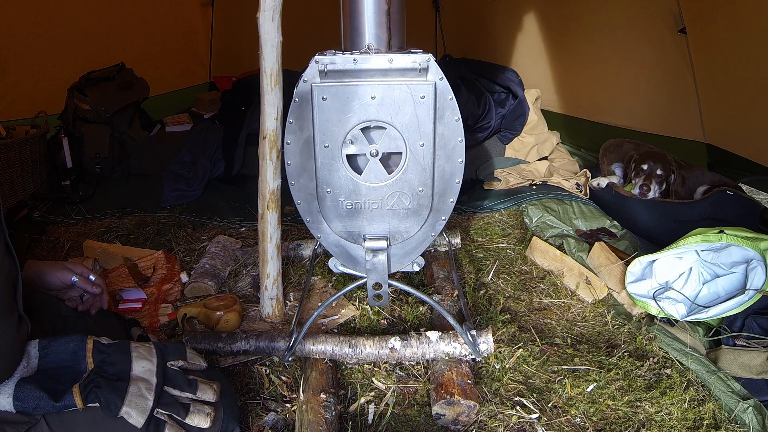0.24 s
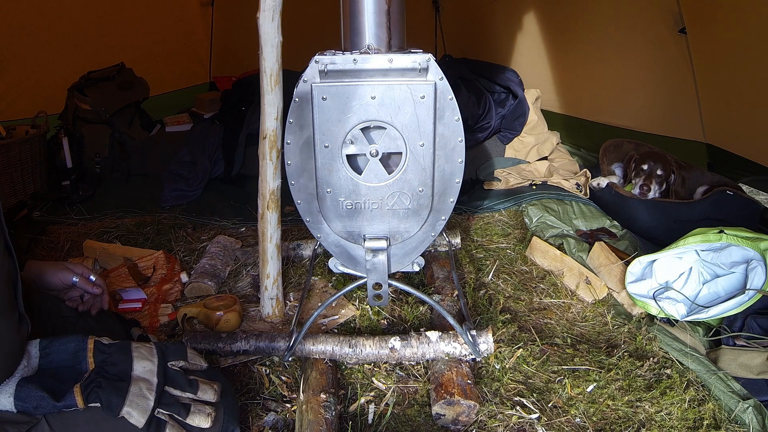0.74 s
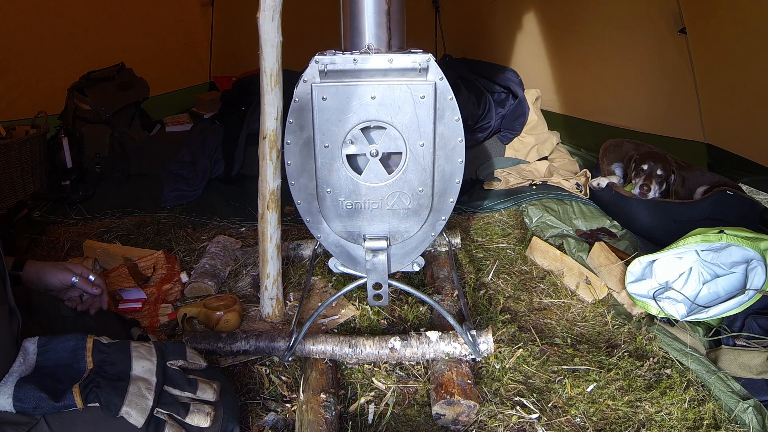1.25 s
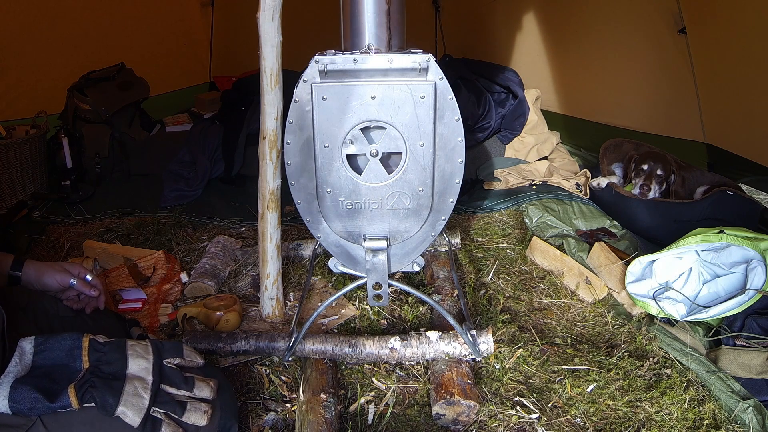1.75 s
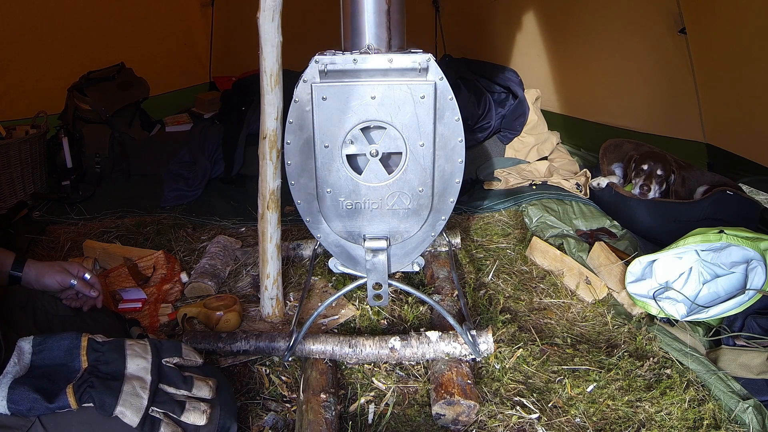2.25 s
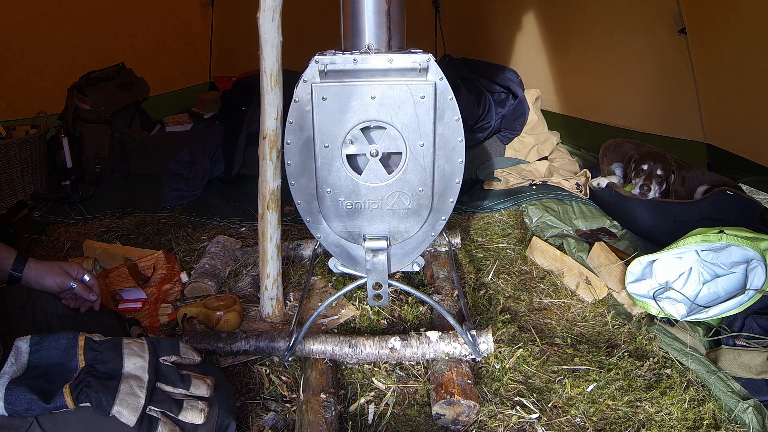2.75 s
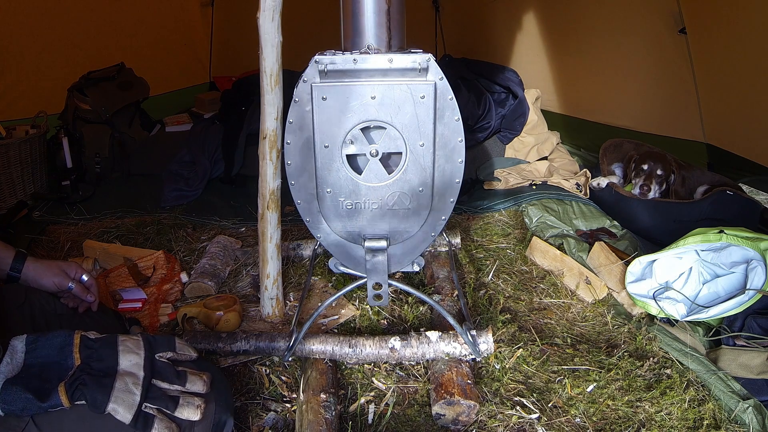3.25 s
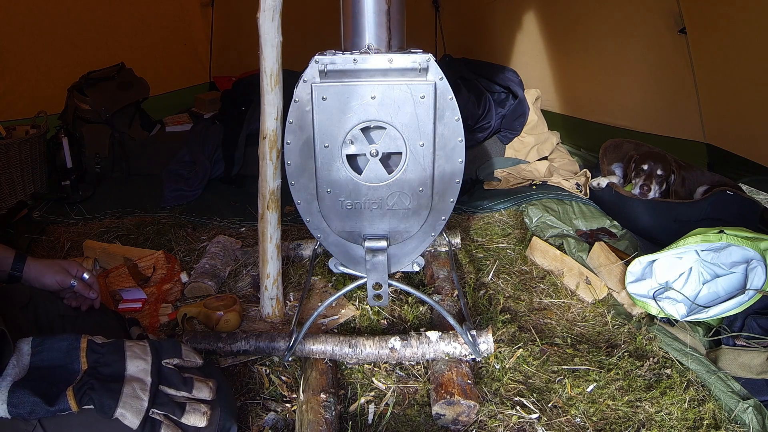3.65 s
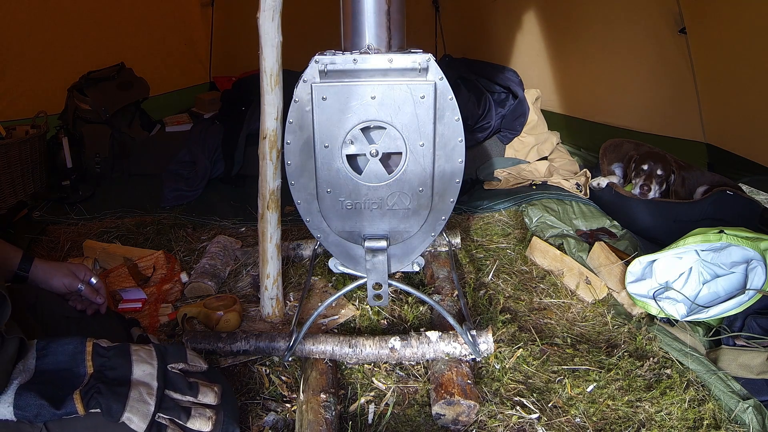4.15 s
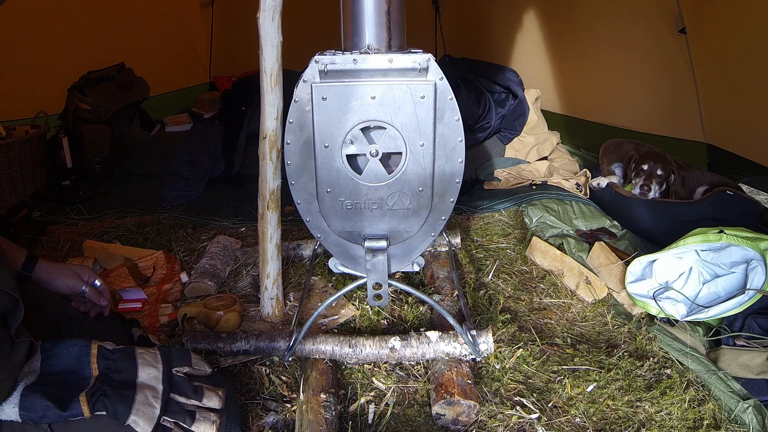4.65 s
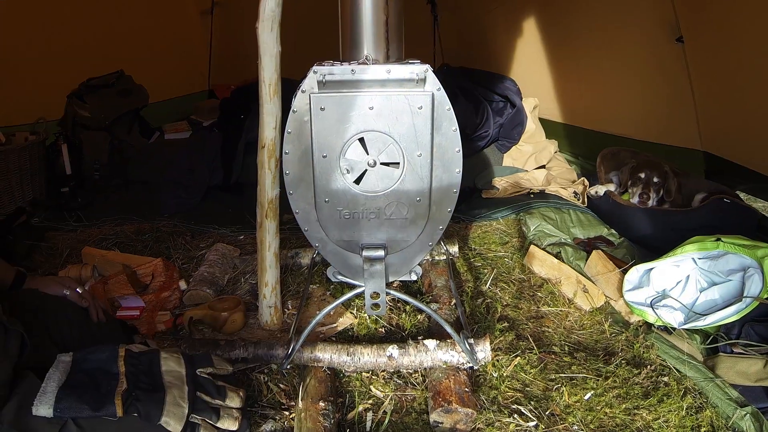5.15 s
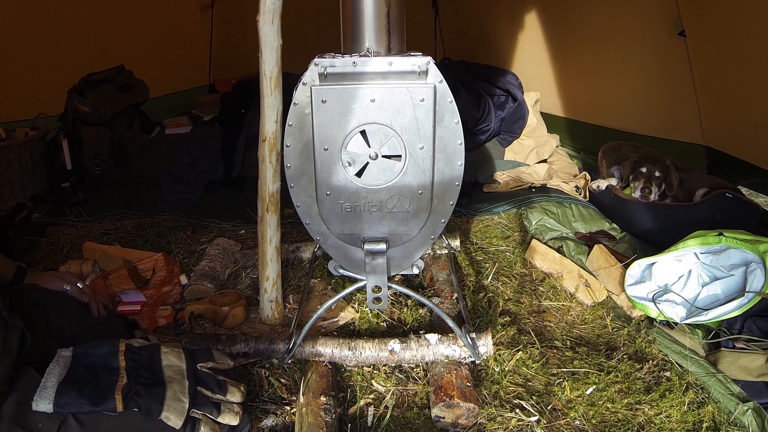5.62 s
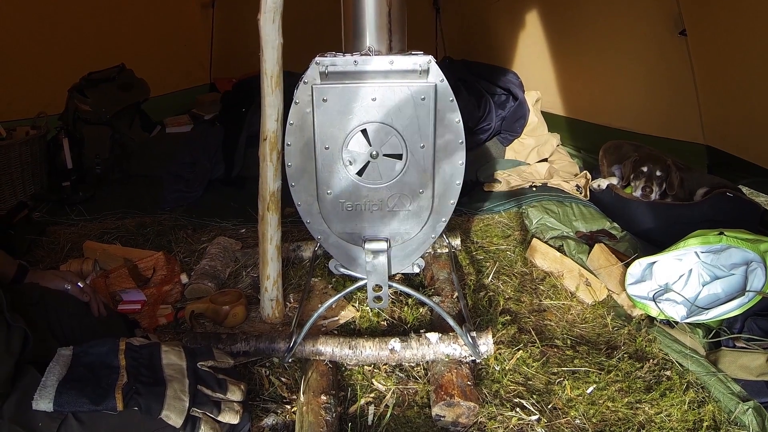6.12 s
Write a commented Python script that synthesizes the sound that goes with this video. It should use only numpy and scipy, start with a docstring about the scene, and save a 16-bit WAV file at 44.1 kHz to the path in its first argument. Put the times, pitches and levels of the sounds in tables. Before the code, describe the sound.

Burning logs snap irregularly inside a thin metal firebox. Bright noisy bursts have short metallic ringing tails, over continuous soft hiss and low fluttering flames. Loud cracks cluster early with low thumps, thin out, return as a fierce trio midway, then give way to small crackles. After a tiny silence, duller little pops lead to one loud crack with a faint pipe ring. Close, dry, centred pickup with automatic level pumping.

```python
"""Log fire in a closed stove

Wood burns in a sheet-steel stove inside a tent. Sap pockets pop as noise bursts and set damped firebox modes ringing;
a log thumps, a spark strikes the flue pipe and embers spit over filtered-noise flames, draught and hiss.
One microphone feeds both channels, each with its own standing offset and a faint noise of opposite sign.
The level drops around loud pops, climbs back slowly, and the sound cuts out once for a moment."""
import sys
import numpy as np
from scipy import signal
from scipy.fft import rfft, irfft, next_fast_len
from scipy.io import wavfile
from scipy.ndimage import uniform_filter1d, map_coordinates

SR = 44100
rng = np.random.default_rng(int(sys.argv[2]) if len(sys.argv) > 2 else 0)


def file_out(sig):
    """Save sig as 16-bit WAV at sys.argv[1]."""
    # one column per channel
    cols = np.atleast_2d(sig).T
    # limit, then scale
    lim = np.clip(cols, -1, 1)
    pcm = np.round(lim * 32767).astype(np.int16)
    wavfile.write(sys.argv[1], SR, pcm)


N = 281355

# All source levels precede the moving gain of record(); pop() adds fixed trims to the pop columns.
# sap pockets that snap: start_s, treble_db, then relative to it upper_db, middle_db, knock_db, echo_db
SAP_POPS = [(0.1592, -27, -4, -7, -34, -7), (0.219, -25.5, -17, -19, -22, -14),
            (0.3496, -43, -13, -13, -15, -5), (0.3597, -39.5, -8, -12, -24, -1.5),
            (0.4141, -45, 0, -10, -13, -4), (0.4747, -33.5, -3, -10, -20, -9.5),
            (0.5492, -32.5, -3, -10, -17, -9), (0.6066, -40.5, -4, -23, -18, -9),
            (0.6515, -39.5, -1, -6, -28, 4.5), (0.663, -23, -6, -9.5, -25, -5),
            (0.7009, -25.5, -1.5, -3.5, -14.5, -11.5), (0.8536, -14, -3, -13.5, -24, -9),
            (0.9035, -3.5, -3, -13, -29, -12.5), (0.9743, -35, -4, -20, -8, -4),
            (1.0754, -2.5, -4.5, -11.5, -22.5, -11.5), (1.1384, -21, -8, -17, -22, -10),
            (1.1904, -24.5, 1, 1, 5, -8), (1.2984, 3, -0.5, -5, -16.5, -13), (1.3981, -37, -8, 0, -8, -16),
            (1.5416, -6, -5.5, -9, -22, -13.5), (1.6951, -48.5, 5, -4, -19, -0.5),
            (1.9087, -36, -6, -16, -13, -7), (1.9428, -30, -5, -9.5, -15, -8),
            (2.1993, -32.5, -6, -9.5, -14, -7), (2.233, -37, -7, -12, -4, -16),
            (2.2783, -33, -3, -13, -22, -8), (2.3258, -40.5, -3.5, -12.5, -11, -4),
            (2.435, -32.5, -8, -11, -27, -3.5), (2.6066, -43.5, -1, 1.5, 4, -4),
            (2.628, -30.5, -6, -9.5, -22, -8.5), (2.776, -38.5, -5, -5, -16, 0),
            (2.867, 5.5, -4.5, -9.5, -23.5, -13.5), (2.9988, 2.5, -9.5, -16, -31.5, -8.5),
            (3.132, 7, -5, -3, -17, -17), (3.3245, -28.5, -8, -16.5, -9, -2),
            (3.417, -42.5, -11, -12, -4.5, -2.5), (3.518, -26, -6, -12, -20, -4.5),
            (3.6088, -46.5, -3, -9, -12, -13), (3.6493, -26.5, -8.5, -11, -15, -12.5),
            (3.8722, -42, -3, -10, -11, -11), (4.0044, -42, -10, -15, -9, -5),
            (4.3284, -14.5, -11.5, -15.5, -25.5, -9.5), (4.4087, -28.5, 8.5, 0.5, -4.5, -12),
            (4.6824, -31.5, -8.5, -9, -11, -9.5), (4.7312, -43, -10, -2, -18, -14),
            (4.8573, -17.5, -14, -14.5, -31.5, -10.5), (5.3044, -57, -13, 8, -18, -9),
            (5.3158, -48.5, -20, -15, -20, -6), (5.3324, -39, -24.5, -25.5, -18, -20),
            (5.467, -30, -17, -15, -18.5, -13), (5.523, -21.5, -20, -13.5, -25, -12.5),
            (5.6671, -43.5, -13, -1, -18, -10), (5.6826, -20.5, -18.5, -11, -19, -10.5),
            (5.8832, 9, -12.5, -12, -23.5, -14.5), (6.1774, -45.5, -11, 1.5, -17.5, -7)]
# soft puffs of gas that swell instead: same columns
GAS_PUFFS = [(5.0152, -32, -19, -6, -28.5, 10), (6.0813, -39.5, -7, 1, -17, 2.4)]
POP_RISE_MS, PUFF_RISE_MS = 0.6, 11.4  # time constants of the onset
UNEVEN_DB = 2.5  # rms unevenness of a pop's spectrum
# spectrum of a pop heard through the steel: freq_hz, level_db
CRACK_SPECTRUM = [(300, -13), (1000, -17.5), (1900, -12.5), (2800, -7.5), (3900, -4), (6000, -1.5),
                  (7400, -3.5), (11000, 1), (15000, -4), (15700, -14.5), (17000, -25)]
# decay of the first burst: freq_hz, t60_s
BURST_DECAY = [(500, 0.018), (3000, 0.037), (10000, 0.04), (15000, 0.02)]
# decay of its echo in firebox and tent: freq_hz, t60_s
ECHO_DECAY = [(500, 0.22), (1500, 0.074), (3500, 0.17), (7000, 0.17), (15000, 0.13)]
# firebox knock modes: pitch_hz, level_db, t60_s
FIREBOX_MODES = [(718, -25.5, 0.92), (755, 8, 0.05), (1112, -18, 0.34), (1390, -6.5, 0.091),
                 (1528, -7, 0.073), (2056, -10.5, 0.14)]
# the largest firebox panel: pitch_hz, level_db, t60_s
PANEL_MODE = [(443, -1, 0.21)]
# crowded upper modes of the sheet: centre_hz, width_hz, level_db
SHEET_MODES = [(1480, 260, -3), (1976, 180, -3), (2310, 96, -1.5), (2440, 88, -0.5), (2740, 150, 0),
               (2990, 63, 3.5), (3076, 52, 0), (3260, 170, -7), (3360, 180, -9), (3690, 110, 1.5),
               (3940, 260, -5), (4380, 220, -4), (4910, 180, -7.5), (5910, 880, -7)]
# a log settles and thumps the stove floor: start_s, level_db, pitch_hz, t60_s
LOG_THUMPS = [(1.1925, -5, 66, .075), (1.1955, -10, 118, .06), (3.0, -9, 108, .06), (1.301, -20, 62, .1)]
# a spark strikes the flue pipe: start_s, level_db
PIPE_STRIKE = (5.885, -30)
# flue pipe modes: pitch_hz, level_db, t60_s
PIPE_MODES = [(832, 0, 0.82), (850, 1, 0.83), (1130, -9.5, .8)]
# flame rumble: freq_hz, level_db
RUMBLE_SPECTRUM = [(15, -1), (30, -4.5), (63, -2), (120, -9.5), (220, -17.5), (400, -19.5), (900, -47)]
# air in the flue: freq_hz, level_db
DRAUGHT_SPECTRUM = [(120, -28.5), (285, -7.5), (356, -10), (433, -0.5), (870, 1.5), (1300, -8),
                    (2250, -22.5), (4000, -42.5)]
# hiss: freq_hz, level_db
HISS_SPECTRUM = [(500, -9), (2250, 2), (4000, -1.5), (7000, -2.5), (10500, -1.5), (12500, -3.5),
                 (15000, -7.5), (15500, -22), (17000, -28)]
# level of the hiss: time_s, level_db
HISS_LEVEL = [(0, -46.5), (.8, -47), (1.6, -47), (2.4, -45), (3.2, -43.5), (3.8, -45.5), (4.4, -47),
              (4.93, -47), (5.0, -47.5), (5.5, -48), (6.38, -45)]
# a brief rushing flare-up: freq_hz, level_db
FLARE_SPECTRUM = [(300, -18), (480, 4.5), (650, -13.5), (850, 3), (1200, -3.5), (1600, -4), (2300, -24)]
# level of the flare-up: time_s, level_db
FLARE_LEVEL = [(2.35, -54.5), (2.55, -46), (2.8, -38.5), (2.9, -48), (3.1, -66.5)]
# faint noise of opposite sign in the two channels: freq_hz, level_db
STRAY_SPECTRUM = [(20, -3.5), (100, 7.5), (300, 1), (800, -7.5), (1500, -22), (16000, -34.5)]
# standing offset before the moving gain, one row for left and one for right: offset [full scale]
CHANNEL_OFFSET = [
    [.52],
    [-0.075],
]
# downward steps of the overall level around loud pops, and across the cut: start_s, new_level_db
LEVEL_DROPS = [(-.06, -3.5), (.889, -7.3), (1.06, -9.6), (1.294, -10.7), (2.852, -8.2), (2.98, -9.6),
               (3.0, -12.2), (3.129, -16), (4.93, -16), (5.87, -14)]
# after a step the level holds, then climbs towards AIM_DB with time constant CLIMB_S, stopping at 0 dB
HOLD_S, AIM_DB, CLIMB_S = 0.055, 23, 2.0
# brief dips during the loudest pops: start_s, recovered_after_s (counted from the start)
LEVEL_DIPS = [(1.299, .043), (1.343, .025), (2.867, .055), (2.999, .009), (3.009, .042), (3.133, .045),
              (3.165, .042), (3.206, .024), (5.883, .055), (5.935, .026)]
DIP_DB, DIP_FALL_S = -4.3, 0.004
# the short silence: stop_s, return_start_s, fully_back_s
SILENT_CUT = (4.9292, 4.961, 4.978)
TOP_HZ = 16100  # nothing is heard above


def pops():
    """Superposition: each pop and puff adds its pressure from its own moment on."""
    out = np.zeros(N + SR)
    events = [(*row, POP_RISE_MS) for row in SAP_POPS] + [(*row, PUFF_RISE_MS) for row in GAS_PUFFS]
    for start_s, *shape in events:
        sound = pop(*shape)
        out[round(start_s * SR):][:len(sound)] += sound
    return out[:N]


def pop(treble_db, upper_db, middle_db, knock_db, echo_db, rise_ms):
    """Impulsive excitation: a short burst of gas drives the steel, which answers in its modes."""
    t = np.arange(int(0.7 * SR)) / SR
    burst = crack(t, upper_db, middle_db, echo_db)
    knock = amp(knock_db + 2.5) * ringing(FIREBOX_MODES, t, scatter_db=0.5)
    panel = amp(knock_db - 5.5) * ringing(PANEL_MODE, t, scatter_db=4.0)
    sheet = amp(middle_db + echo_db - 4.5) * shimmer(t, t60=0.47)
    rise = 1 - np.exp(-1000 * t / rise_ms)
    return amp(treble_db) * rise * (amp(9.0) * burst + knock + panel + sheet)


def crack(t, upper_db, middle_db, echo_db):
    """Frequency-dependent damping: each band of a noise burst dies fast, then slowly in its echo."""
    hz, frame_s, z = signal.stft(rng.standard_normal(len(t)), SR, nperseg=128, noverlap=96)
    tilt = [(3800, middle_db + 9.5), (6300, upper_db + 5.0), (9500, 0.012)]
    # every pocket has its own colour
    uneven = UNEVEN_DB * unit(uniform_filter1d(rng.standard_normal(len(hz)), size=3))
    colour = along(CRACK_SPECTRUM, hz) + along(tilt, hz) + uneven
    fast = amp(-60 * frame_s / along(BURST_DECAY, hz)[:, None])
    slow = amp(-60 * frame_s / along(ECHO_DECAY, hz)[:, None])
    z *= amp(colour)[:, None] * (fast + amp(echo_db) * slow)
    burst = signal.istft(z, SR, nperseg=128, noverlap=96)[1][:len(t)]
    # the wood tears in uneven jerks, whose size in dB fades away
    steps = np.repeat(rng.standard_normal(len(t) // 64 + 1), 64)[:len(t)]
    jerks_db = 2.77 * uniform_filter1d(steps, size=32) * amp(-60 * t / 0.096)
    return burst * amp(jerks_db)


def ringing(modes, t, scatter_db):
    """Modal decay: a struck body sounds as damped sines, at new strengths and slightly new pitches."""
    out = np.zeros(len(t))
    for pitch_hz, level_db, t60 in modes:
        strength, detune = rng.standard_normal(2)
        envelope = amp(level_db + scatter_db * strength - 60 * t / t60)
        out += envelope * np.sin(2 * np.pi * pitch_hz * (1 + 0.0033 * detune) * t)
    return out


def shimmer(t, t60):
    """Modal overlap: noise passed through crowded sheet resonances shimmers as it dies."""
    f = np.fft.rfftfreq(len(t), 1 / SR)
    response = np.zeros(len(f), complex)
    for k, (centre, width, level_db) in enumerate(SHEET_MODES):
        resonance = 1j * f * width / (centre * centre - f * f + 1j * f * width)
        response += (-1) ** k * amp(level_db) * resonance  # neighbours alternate in sign
    noise = irfft(rfft(rng.standard_normal(len(t))) * response, len(t))
    return unit(noise) * amp(-60 * t / t60)


def thumps():
    """Low-frequency impact: each soft blow is a damped sine that pulls inward first."""
    out, t = np.zeros(N + SR), np.arange(SR // 2) / SR
    for start_s, level_db, pitch_hz, t60 in LOG_THUMPS:
        envelope = amp(level_db - 60 * t / t60) * (1 - np.exp(-t / 0.0046))
        out[round(start_s * SR):][:len(t)] -= envelope * np.sin(2 * np.pi * pitch_hz * t)
    return out[:N]


def pipe_ping():
    """Free vibration: the flue pipe rings on in its own modes after one strike."""
    out, t = np.zeros(N + SR), np.arange(SR // 2) / SR
    start_s, level_db = PIPE_STRIKE
    out[round(start_s * SR):][:len(t)] += amp(level_db) * ringing(PIPE_MODES, t, scatter_db=1.0)
    return out[:N]


def ticks(count):
    """Random impulses: embers spit at chance moments as short treble puffs, mostly tiny."""
    when, size = rng.random((count, 2)).T
    hits = np.zeros(N)
    hits[(when * N).astype(int)] = amp(-48.0 - 2.3 * np.log(size))
    decay = amp(-60 * np.arange(SR // 10) / SR / 0.048)
    return signal.fftconvolve(hits, decay)[:N] * rush(CRACK_SPECTRUM, patchy_db=4.0)


def fire():
    """Turbulence: flames, flue draught, hiss and flare-up are coloured noises of unsteady strength."""
    rumble = amp(-38.5 + 2 * wobble(9.8)) * rush(RUMBLE_SPECTRUM, patchy_db=1.5)
    draught = amp(-42.5 + 0.7 * wobble(4)) * rush(DRAUGHT_SPECTRUM, patchy_db=1.5)
    hiss_db = curve(HISS_LEVEL) + 0.8 * wobble(2.56) + 0.3 * wobble(23)
    hiss = amp(hiss_db) * rush(HISS_SPECTRUM, patchy_db=1.5)
    flare = amp(curve(FLARE_LEVEL)) * rush(FLARE_SPECTRUM, patchy_db=2)
    return rumble + draught + hiss + flare


def stray_noise():
    """Antiphase: one faint noise enters the two channels with opposite sign."""
    return amp(-48.5) * rush(STRAY_SPECTRUM, patchy_db=5.5) * np.array([[1], [-1]])


def rush(spectrum, patchy_db):
    """Spectral shaping: white noise takes random gains in time-frequency patches, then a colour, at rms 1."""
    z = signal.stft(rng.standard_normal(N), nperseg=512)[2]
    field = uniform_filter1d(rng.standard_normal(z.shape), size=6, axis=0)
    field = uniform_filter1d(field, size=14, axis=1)
    patchy = signal.istft(z * amp(patchy_db * unit(field)), nperseg=512)[1][:N]
    return unit(filtered(patchy, lambda hz: amp(along(spectrum, hz))))


def wobble(rate):
    """Slow fluctuation: a smooth curve through random knots, rate of them a second."""
    knots = rng.standard_normal(int(N * rate / SR) + 4)
    return map_coordinates(knots, [np.arange(N) * rate / SR])


def filtered(x, response):
    """Convolution theorem: filtering is multiplication by a response of frequency."""
    m = next_fast_len(N + SR // 2)
    return irfft(rfft(x, m) * response(np.fft.rfftfreq(m, 1 / SR)), m)[..., :N]


def along(points, hz):
    """Logarithmic pitch scale: (Hz, value) points joined on a log axis."""
    f, v = np.transpose(points)
    return np.interp(np.log(hz + 1), np.log(f + 1), v)


def curve(rows):
    """Linear interpolation: (s, value) rows become one value per sample."""
    return np.interp(np.arange(N) / SR, *np.transpose(rows))


def amp(db):
    """Decibel law: 20 dB is a tenfold amplitude."""
    return 10 ** (np.asarray(db) / 20)


def unit(x):
    """Mean-square normalization: x scaled to rms 1."""
    return x / np.sqrt(np.mean(x ** 2) + 1e-20)


def level_db():
    """Exponential recovery: the level steps, holds and climbs slowly, with brief dips on top."""
    t = np.arange(N) / SR
    step_s, step_db = np.transpose(LEVEL_DROPS)
    last = np.searchsorted(step_s, t, side="right") - 1
    climbing = np.maximum(t - step_s[last] - HOLD_S, 0)
    slow_db = AIM_DB - (AIM_DB - step_db[last]) * np.exp(-climbing / CLIMB_S)
    dips = [curve([(at, 0), (at + DIP_FALL_S, DIP_DB), (at + back, 0)]) for at, back in LEVEL_DIPS]
    return np.minimum(slow_db, 0) + np.min(dips, axis=0)


def scene():
    """Superposition: the sources add, alike in both channels except for the stray noise."""
    return pops() + thumps() + pipe_ping() + ticks(count=50) + fire() + stray_noise()


def record(dry):
    """Transmission: offset, moving level, short cut, clipping at full scale and band limit."""
    stop, start, back = SILENT_CUT
    gate = curve([(0, 1), (stop, 1), (stop + 1 / SR, 0), (start, 0), (back, 1)])
    gain = uniform_filter1d(amp(level_db()), size=90) * gate  # level smoothed over 90 samples
    clipped = np.clip((dry + CHANNEL_OFFSET) * gain, -1, 1)
    return filtered(clipped, lambda hz: hz < TOP_HZ)


dry = scene()
out = record(dry)
file_out(out)
```